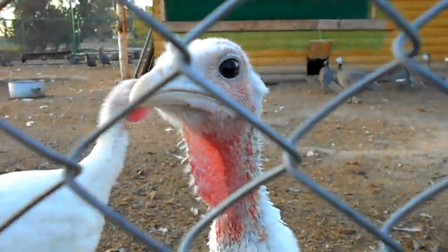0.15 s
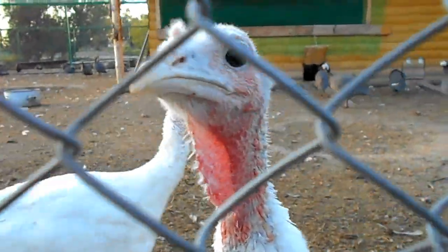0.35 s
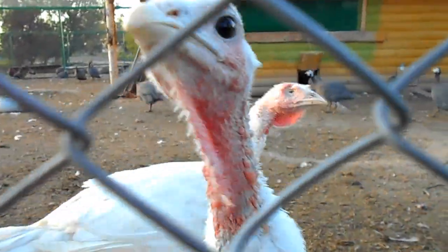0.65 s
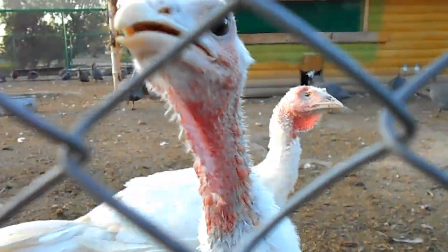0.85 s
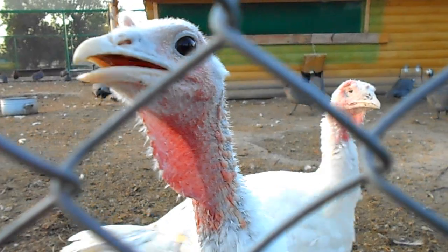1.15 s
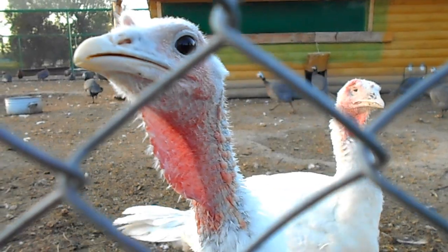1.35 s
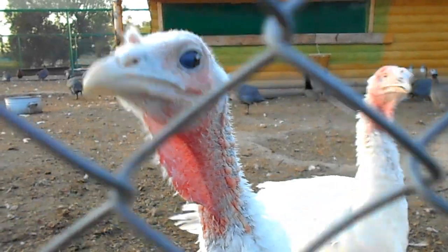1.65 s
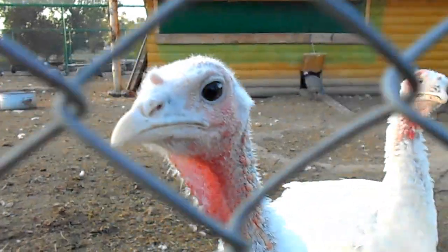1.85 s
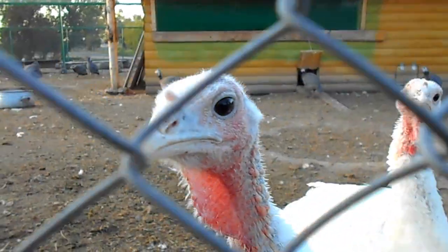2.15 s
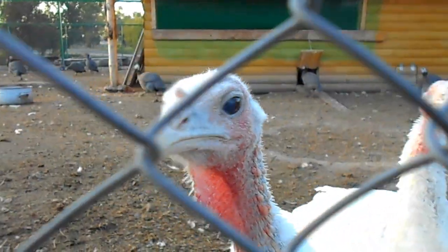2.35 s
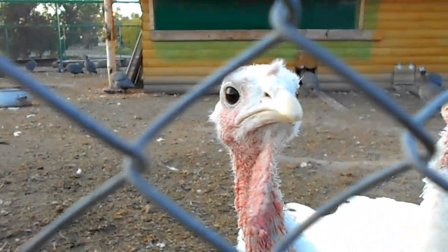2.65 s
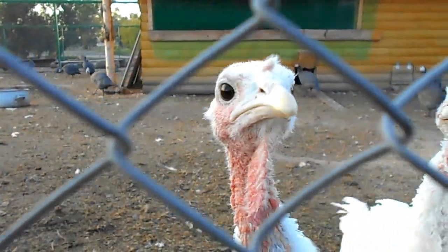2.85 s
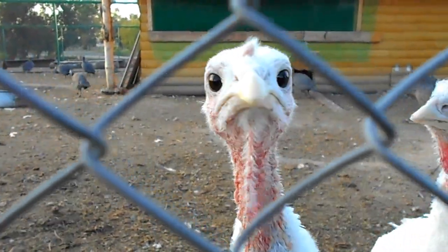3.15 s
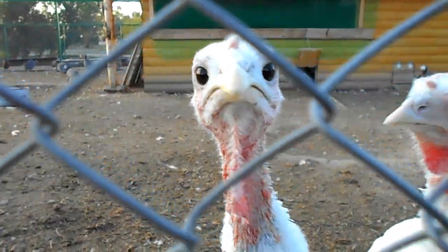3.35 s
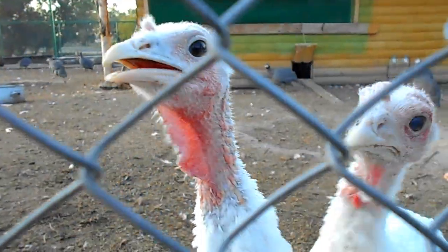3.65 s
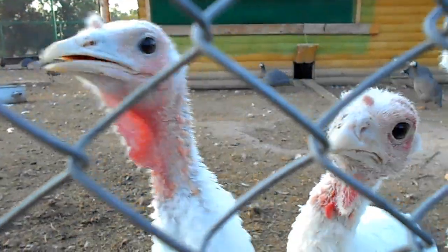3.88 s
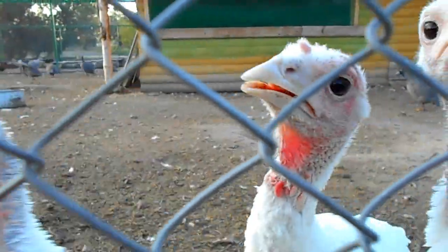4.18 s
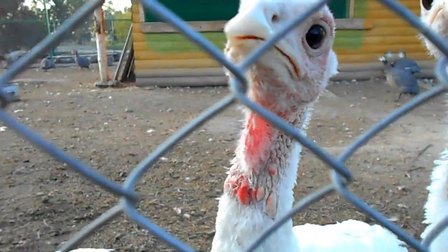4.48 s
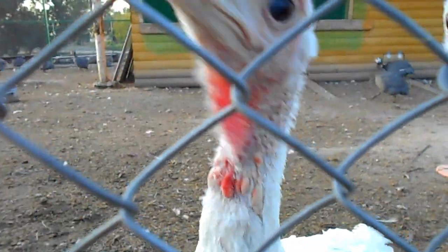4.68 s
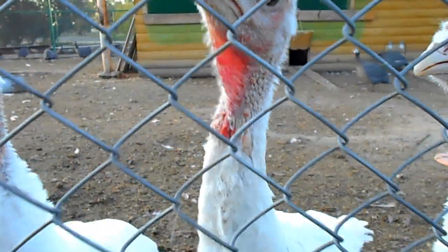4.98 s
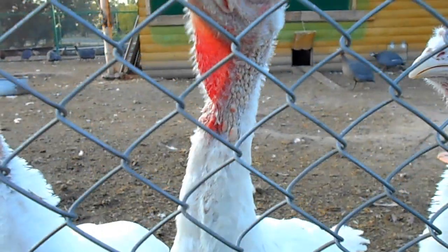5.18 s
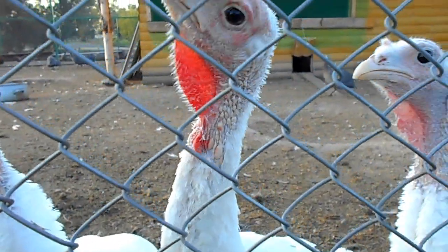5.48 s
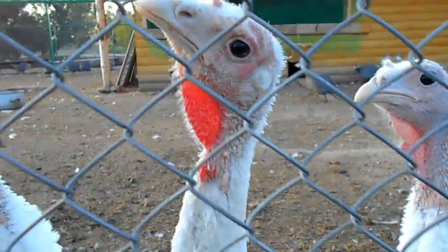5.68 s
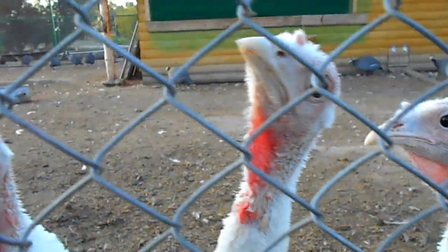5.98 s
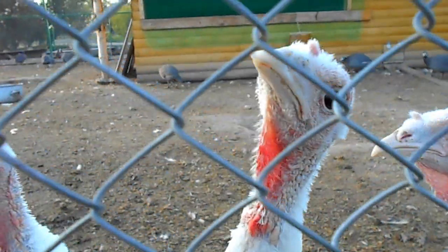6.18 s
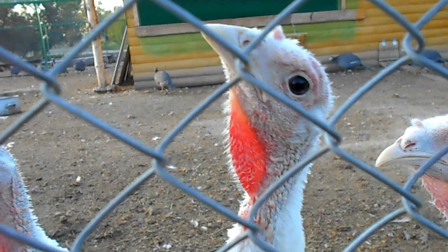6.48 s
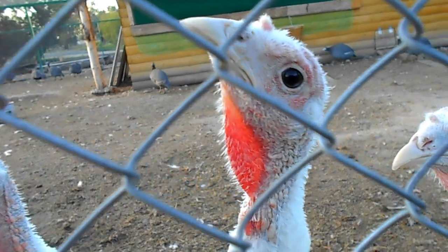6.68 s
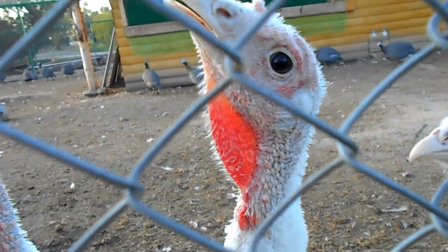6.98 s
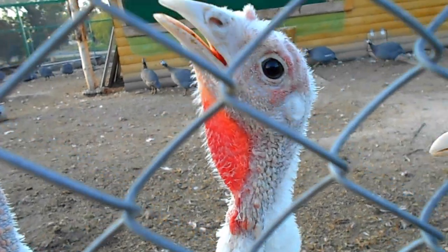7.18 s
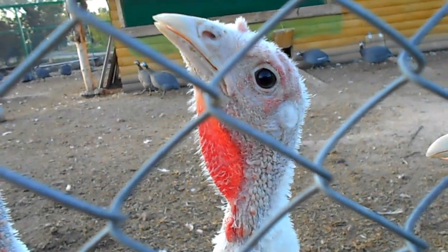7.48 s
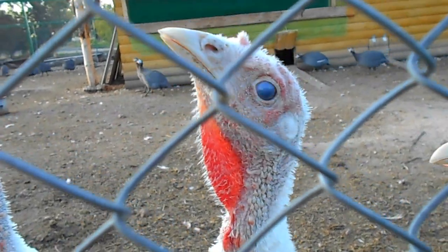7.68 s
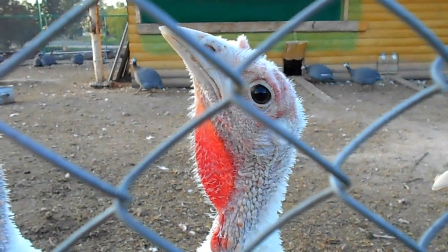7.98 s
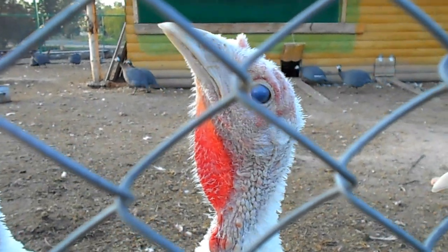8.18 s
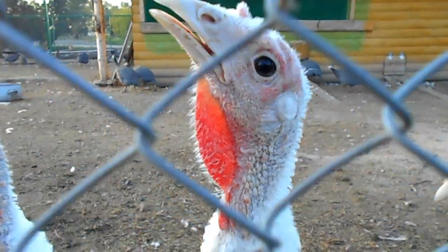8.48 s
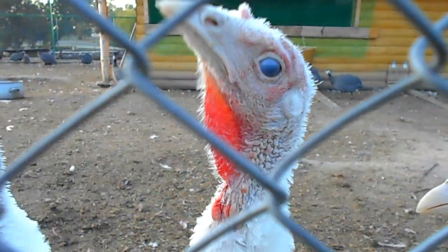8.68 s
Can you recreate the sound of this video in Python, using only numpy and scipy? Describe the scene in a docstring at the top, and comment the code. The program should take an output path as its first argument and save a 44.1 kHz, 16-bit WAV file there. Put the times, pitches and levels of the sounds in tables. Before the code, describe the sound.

A small flock of turkeys sounds off behind a fence, the nearest birds very loud and nearly dry, others softer with short outdoor scatter. Raspy squawks come first, followed by bunches of piercing, cracking yelps, nasal whining and fluttering trills. Later, two-note cries, long then short, stand out among whines and yelps. Distant calls murmur throughout, and a last sharp yelp ends it.

```python
"""Turkeys in a farmyard pen: a coloured-noise din and hoarse squawks (tone, rasp, subharmonics) open the scene.
Nasal whines, peeps and breathy puffs join, with random faint calls across the yard.
Near yelps follow: a loud upward leap, a thin rattling whistle, a break into a loud fall; overloads crackle.
Then come warbling trills and dry noise ticks, and from mid-scene smoother two-note cries, long then short."""
import sys
import numpy as np
from scipy import signal
from scipy.fft import rfft, irfft
from scipy.io import wavfile

SR = 44100
rng = np.random.default_rng(int(sys.argv[2]) if len(sys.argv) > 2 else 0)


def to_wav(s):
    """Save 16-bit WAV."""
    ch = np.atleast_2d(s).T  # columns
    pcm = np.round(np.clip(ch, -1, 1) * 32767)  # PCM
    wavfile.write(sys.argv[1], SR, pcm.astype(np.int16))


N = 389844
T = np.arange(N) / SR
TOP_HZ = 15800  # upper band limit

# distant din, spectral shape: [f/Hz, density/dB per Hz]
DIN_SPECTRUM = [(25, -23), (60, -18.5), (120, -18.5), (300, -5), (600, -1.5), (1000, 2), (1700, 1.5),
                (2800, 0), (4200, -4.5), (6000, -15), (9500, -20.5), (11500, -48)]
# din swell about DIN_DB: [t/s, level/dB]
DIN_SWELL = [(0, 10.5), (.35, 6.5), (1.0, 7.5), (1.38, -4.5), (2.0, 9.5), (3.1, 7), (3.95, -9.5),
             (4.5, 4.5), (5.5, -2.5), (6.3, 5.5), (6.85, -2.5), (7.5, 2.5), (8.1, -3.5), (8.84, 4.5)]
DIN_DB = -59

# hoarse squawks: [start t/s, break t/s, end t/s, tone level/dB, rasp level/dB, tail level/dB]
SQUAWKS = [(-.12, .045, .11, -32, -27.5, -36), (0.516, 0.654, .717, -24.5, -28.5, -32.5),
           (1.718, 1.844, 1.908, -28.5, -27.5, -34), (2.349, 2.451, 2.512, -25.5, -25.5, -30),
           (2.94, 3.052, 3.127, -27.5, -27.5, -33), (3.556, 3.692, 3.745, -34, -34.5, -44)]
# squawk rasp, noise shape and growl partials: [f/Hz, level/dB]
RASP = [(60, -54), (250, -21.5), (700, -23.5), (1100, -8.5), (1500, 8.5), (2000, -3), (2800, 4.5),
        (3400, -7.5), (4500, -24), (6000, -30.5), (8500, -33), (11000, -53.5)]
# partials of a squawk's tail: [f/Hz, level/dB]
SQUAWK_TAIL = [(900, -12.0), (1850, 4.5), (2800, -3.0), (3700, -32.5), (8000, -45.5)]

# peeps and low clucks: [start t/s, end t/s, pitch f/Hz, level/dB]
PEEPS = [(0.366, 0.448, 1254, -34.5), (0.396, .49, 1450, -39.5), (0.452, 0.496, 2812, -28.5),
         (0.983, 1.022, 1258, -29), (3.148, 3.229, 1190, -49.5), (3.387, 3.43, 1643, -49),
         (5.582, 5.732, 1268, -48.5), (5.63, 5.712, 1487, -43.5), (6.347, 6.388, 2720, -34),
         (7.372, 7.428, 495, -52), (7.492, 7.543, 509, -51), (8.24, 8.267, 780, -48),
         (6.88, 6.938, 1176, -54.5), (7.542, 7.67, 1720, -54.5), (7.692, 7.736, 1320, -52),
         (7.829, 7.937, 2750, -55), (8.491, 8.597, 790, -52)]
PEEP_SAG = .04  # share of the pitch lost over a peep

# nasal whines: [start t/s, end t/s, pitch f/Hz, level/dB, buzz/0-1]
WHINES = [(0.372, 0.469, 745, -46, 0.7), (1.193, 1.308, 936, -41, 0.18), (1.395, 1.544, 977, -49.5, 0.12),
          (1.519, 1.836, 915.3, -38.5, 0.33), (1.913, 2.034, 909, -39.5, 0.02),
          (2.078, 2.324, 858, -36, 0.24), (2.473, 2.602, 869, -42, 0.22), (2.621, 2.817, 833, -47.5, 0.44),
          (3.568, 3.716, 880, -51.5, 0.6), (4.393, 4.777, 855, -45.5, .02),
          (5.616, 5.744, 940, -54.5, 0.14), (5.778, 6.092, 880, -45, 0.64), (6.092, 6.214, 984, -43, 0.3),
          (6.21, 6.387, 894, -40, 0.33), (6.413, 6.562, 930, -44, 0.73), (6.573, 6.754, 863, -52.5, 0.74),
          (6.74, 6.95, 857, -57, .05), (7.523, 7.679, 858, -56.5, 0.04)]
# partials of a whine: [f/Hz, level/dB]
NASAL = [(290, -10), (550, -19.5), (900, -7.5), (1350, -13), (1800, -10.5), (2150, -13.5), (2680, 1.5),
         (3100, -6.5), (3600, -13.5), (4400, -24.5), (5200, -30.5), (6200, -37.5), (9000, -43),
         (11000, -60)]
WHINE_SAG_HZ, WHINE_STEADY_S = 248, .15  # short whines slide down, long ones hold their pitch

# random far calls, per kind
FAR_CALLS_PER_S, FAR_PEEP_DB, FAR_WHINE_DB, FAR_MEAN_S = 3.0, -58.5, -67.5, .12

# puffs of air from the beaks: [start t/s, end t/s, centre f/Hz, width f/Hz, level/dB]
PUFFS = [(.46, 0.5, 3200, 1150, -32), (.9, 1.058, 6300, 900, -59.5), (3.34, 3.472, 6200, 880, -58.5),
         (7.09, 7.175, 4000, 1245, -38.5)]
# hiss of the open beak, spectral shape: [f/Hz, density/dB per Hz]
HISS = [(800, -46), (2500, -10.5), (4300, 4.5), (5200, -15.5), (6400, -6.5), (7500, -10.5), (9700, -13.5),
        (11200, -33.5)]

# yelps: [start t/s, break t/s, end t/s, crest f/Hz, leap level/dB, whistle level/dB, fall level/dB]
YELPS = [(.787, 0.89, .953, 2590, -6.5, -33, -15), (1.001, 1.069, 1.097, 2950, -5, -31, -15.5),
         (1.014, 1.107, 1.139, 2540, -22.5, -39, -30.5), (1.147, 1.23, 1.262, 3305, -8.5, -38, -17),
         (2.043, 2.159, 2.199, 2590, -21.5, -31, -16.5), (2.258, 2.338, 2.373, 2550, -13.5, -30.5, -14),
         (3.226, 3.333, 3.384, 2510, -14.5, -25, -15), (3.424, 3.516, 3.553, 2550, -10.5, -29.5, -15),
         (3.44, 3.539, 3.59, 2400, -8, -31.5, -16.5), (3.628, 3.704, 3.732, 2600, -13.5, -25.5, -16.5),
         (3.637, 3.711, 3.752, 2810, -6, -43, -18.5), (3.781, 3.861, 3.891, 3253, -9.5, -35, -17.5),
         (4.56, 4.665, 4.717, 2500, -17.5, -29, -15.5), (4.774, 4.855, 4.891, 2130, -6, -27.5, -17.5),
         (6.167, 6.272, 6.327, 2604, -15, -42, -18), (6.38, 6.454, 6.477, 2955, -5.5, -41, -16.5),
         (6.534, 6.626, 6.654, 3244, -10.5, -38.5, -16), (6.938, 7.107, 7.153, 2450, -24.5, -40.5, -20.5),
         (7.201, 7.286, 7.325, 2400, -16.5, -28.5, -19), (8.584, 8.707, 8.745, 2410, -46, -33.5, -21.5),
         (8.808, 8.885, 8.93, 2580, -12.5, -43.5, -15)]
# overtones against the fundamental, before brightening and rolloff: [f/Hz, level/dB]
THROAT = [(1000, -10), (1750, -0.5), (2150, -20.5), (2700, -17), (3400, -29), (4200, -36.5), (5000, -38),
          (6500, -43.5), (8200, -52.5), (10500, -70.5)]
# throat turbulence, spectral shape: [f/Hz, density/dB per Hz]
TURBULENCE = [(60, -68.5), (200, -49), (420, -22), (700, -12), (1250, 2), (2000, -6.5), (3000, -13),
              (4300, -31.5), (5400, -40.5), (6300, -30), (7300, -38), (9500, -40), (11500, -57.5)]
# a harder push makes the leap longer and carries its pitch higher; values hold at FULL_LEAP_DB
LEAP_S, LEAP_GROWTH, FULL_LEAP_DB = .0245, .2, -8
LEAP_FROM_HZ, LEAP_RISE_HZ = 1000, 1061
MAX_ATTACK_S, ONSET_DROP_DB, DWELL_SHARE = 0.0041, 3.5, .33
EASY_LEAP_DB, LEAD_IN_DB_PER_DB = -19.5, 0.43  # harder leaps build up from further below their peak
# time to the whistle's crest, pitch at the break, fading on the way, rattle beneath
CLIMB_S, BREAK_HZ, WHISTLE_FADE_DB, RATTLE_DB = .018, 1885, 4, -36
YELP_SAG, CRY_SAG = .33, 0.55  # share of the crest-to-break sag done halfway
YELP_SLIDE, CRY_SLIDE = 0.14, 0.44  # share of the climb that glides rather than jumps
YELP_SECOND, CRY_SECOND = 0.18, 0.95  # second membrane gain in leap and fall

# trills: [start t/s, end t/s, level/dB]
TRILLS = [(1.505, 1.795, -34), (2.72, 2.974, -26)]

# ticks: [t/s, level/dB, decay t/s]
TICKS = [(2.756, -38.5, .002), (4.261, -41, 0.036), (5.258, -40.5, 0.018), (8.443, -50, .003),
         (8.65, -37, 0.001)]

# two-note cries: [long start t/s, long end t/s, short start t/s, short end t/s, level/dB]
CRIES = [(4.027, 4.217, 4.28, 4.396, -16.5), (5.007, 5.216, 5.275, 5.388, -13.5),
         (6.935, 7.165, 7.219, 7.337, -14.5)]
# cry notes, long then short; levels relative to the cry: [edge f/Hz, crest f/Hz, leap level/dB,
# crest level/dB, pre-break level/dB, fall level/dB, hiss level/dB, share of note before hiss]
CRY_NOTES = [(1582, 1920, -17, -12.5, -2.5, -2, -34, 0.9), (1736, 2340, 1.5, -8.5, 0.5, -3.5, -34, .02)]
CRY_LEAP_S, CRY_CLIMB_S, CRY_HISS_LAG_S = .018, 0.028, .035
CRY_FALL_SHARE, CRY_RATTLE_DB = .16, -32.5  # share of the note; relative to the cry

# overload crackle, spectral shape: [f/Hz, density/dB per Hz]
CRACKLE = [(50, -15), (400, 0.5), (4000, 5.5), (9000, -7.5), (12000, -22), (16000, -23)]
# microphone response: [f/Hz, level/dB]
MICROPHONE = [(20, -11), (90, -2), (10000, 1.5), (11500, -7.5)]


def undb(db):
    """Decibels to gain."""
    return 10 ** (np.asarray(db) / 20)


def gain_at(hz, spectrum):
    """Gain of a [f/Hz, level/dB] spectrum, joined on a log-frequency axis."""
    points_hz, db = np.transpose(spectrum)
    return undb(np.interp(np.log(hz + 1), np.log(points_hz), db))


def equalize(x, spectrum):
    """Zero-phase filter with the gain of a spectrum."""
    bins_hz = np.arange(N // 2 + 1) * SR / N
    return irfft(rfft(x) * gain_at(bins_hz, spectrum), N)


def noise(spectrum):
    """Coloured noise of rms 1."""
    x = equalize(rng.standard_normal(N), spectrum)
    return x / x.std()


def fresh_rng():
    """Independent generator seeded by one draw."""
    return np.random.default_rng(rng.integers(2 ** 31))


def walk(t, rate_hz):
    """Random wander of spread near 1, with rate_hz new target points a second."""
    steps = fresh_rng().standard_normal(2048)
    return np.interp((t - t[0]) * rate_hz, np.arange(len(steps)), steps)


def span(start, end):
    """Sample indices and times of a call."""
    i = np.arange(max(int(start * SR), 0), min(int(end * SR), N))
    return i, T[i]


def fade(t, start, end, edge_s):
    """Smooth opening and closing of a call."""
    return np.sin(np.pi / 2 * np.clip(np.minimum(t - start, end - t) / edge_s, 0, 1)) ** 2


def phase_of(hz):
    """Running phase of a pitch contour."""
    return 2 * np.pi * np.cumsum(hz) / SR


def partials(hz, spectrum, multiples, uneven_db=2.53):
    """Multiples of a pitch, weighted by a throat that keeps shifting."""
    phase, t = phase_of(hz), T[:len(hz)]
    out = np.zeros(len(hz))
    for k in multiples:
        gain = gain_at(k * hz, spectrum) * undb(uneven_db * walk(t, 24)) * (k * hz < TOP_HZ)
        out += gain * np.sin(k * phase)
    return np.sqrt(2) * out


def whistle(hz, bright_db=0, rolloff_db=-2, shimmer=0.7, smear=0.48):
    """Syrinx tone; overtones weaken with their order and flicker each on its own."""
    phase, t = phase_of(hz), T[:len(hz)]
    out = np.sin(phase)
    for k in range(2, 7):
        gain = gain_at(k * hz, THROAT) * undb(bright_db + rolloff_db * (k - 2)) * (k * hz < TOP_HZ)
        out += gain * (1 + shimmer * walk(t, 160)) * np.sin(k * phase + smear * k * walk(t, 350))
    return np.sqrt(2) * out


def ring(x, hz, width_hz):
    """One resonance, gain 1 at its centre."""
    return signal.lfilter(*signal.iirpeak(hz, hz / width_hz, fs=SR), x)


def pen(x, near_db=-23, near_t60_s=0.21, far_db=-39, far_t60_s=0.15):
    """Scatter around the pen: two decaying noise tails starting 2 ms after the direct sound."""
    t = T[:SR // 2]
    response = np.zeros(len(t))
    for db, t60_s in ((near_db, near_t60_s), (far_db, far_t60_s)):
        tail = rng.standard_normal(len(t)) * np.exp(-np.log(1000) * t / t60_s) * (t > .002)
        response += undb(db) * tail / np.linalg.norm(tail)
    return x + signal.fftconvolve(x, response)[:N]


def far_calls(low_hz, high_hz, db, spread_db=6):
    """Random faint calls across the yard: [start t/s, end t/s, pitch f/Hz, level/dB]."""
    draws = fresh_rng().random((int(FAR_CALLS_PER_S * T[-1]), 4))
    calls = []
    for when, length, pitch, loud in draws:
        start = when * T[-1]
        end = start + FAR_MEAN_S * (.5 + length)
        calls.append((start, end, low_hz * (high_hz / low_hz) ** pitch, db + spread_db * (loud - .5)))
    return calls


def din():
    """Distant din of the farm: coloured noise, gently swelling."""
    db = DIN_DB + np.interp(T, *np.transpose(DIN_SWELL)) + 0.5 * walk(T, 42)
    return undb(db) * noise(DIN_SPECTRUM)


def squawks(first_hz=1200, last_hz=1520, tail_hz=950, growl_db=-5, growl_jitter=.035):
    """A rising tone turns hoarse, with ragged partials on a third of its pitch, then breaks lower."""
    out, rasp = np.zeros(N), noise(RASP)
    for start, brk, end, tone_db, rasp_db, tail_db in SQUAWKS:
        i, t = span(start, end)
        hz = first_hz + (last_hz - first_hz) * np.clip((t - start) / (brk - start), 0, 1) ** 0.77
        tone = whistle(hz * (1 + 0.02 * walk(t, 270))) * (1 + .3 * walk(t, 150))
        out[i] += undb(tone_db) * fade(t, start, brk + 0.011, 0.028) * tone
        growl = partials(hz / 3 * (1 + growl_jitter * walk(t, 500)), RASP, np.arange(2, 12))
        hoarse = 0.9 * rasp[i] + undb(growl_db) * growl / growl.std()
        out[i] += undb(rasp_db) * fade(t, start + 0.013, end - .005, 0.071) * hoarse
        falling_hz = tail_hz * (1 - .7 * (t - brk) + .008 * walk(t, 250))
        tail = partials(falling_hz, SQUAWK_TAIL, np.arange(1, 9))
        out[i] += undb(tail_db) * fade(t, brk - .02, end + 0.0096, 0.045) * tail
    return out


def peeps():
    """Short soft downward glides, near and far."""
    out = np.zeros(N)
    for start, end, pitch_hz, db in PEEPS + far_calls(low_hz=1109, high_hz=2770, db=FAR_PEEP_DB):
        i, t = span(start, end)
        sag = PEEP_SAG * (.5 - (t - start) / (end - start))
        hz = pitch_hz * (1 + sag) * (1 + .014 * walk(t, 260))
        out[i] += undb(db) * fade(t, start, end, 0.017) * whistle(hz)
    return out


def whines(jitter=0.0075, far_buzz=0.27):
    """Nasal notes; when they buzz, every third cycle differs and lines appear between the harmonics."""
    out = np.zeros(N)
    thirds = np.array([k / 3 for k in range(1, 20) if k % 3])
    far = [(*call, far_buzz) for call in far_calls(low_hz=786, high_hz=1080, db=FAR_WHINE_DB)]
    for start, end, pitch_hz, db, buzz in WHINES + far:
        i, t = span(start, end)
        sag_hz = WHINE_SAG_HZ * np.exp(-((end - start) / WHINE_STEADY_S) ** 2)
        hz = pitch_hz + sag_hz * (.5 - (t - start) / (end - start))
        hz = hz * (1 + jitter * walk(t, 300) + .005 * walk(t, 19))
        voice = partials(hz, NASAL, np.arange(1, 9)) + buzz * partials(hz, NASAL, thirds)
        out[i] += undb(db - 3 + 0.85 * walk(t, 55)) * fade(t, start - .008, end + .008, 0.029) * voice
    return out


def puffs(cry_hz=5000, cry_width_hz=9000):
    """Air forced through a narrow beak opening; a broad hiss also accompanies every note of a cry."""
    out, air = np.zeros(N), noise(HISS)
    with_cries = [(start + wait * (end - start), end + CRY_HISS_LAG_S, cry_hz, cry_width_hz, db + hiss_db)
                  for start, end, db, (*_, hiss_db, wait) in cry_notes()]
    for start, end, hz, width_hz, db in PUFFS + with_cries:
        i, t = span(start, end)
        x = ring(air[i], hz, width_hz)
        out[i] += undb(db + 2.5 * walk(t, 90)) * fade(t, start, end, .025) * x / x.std()
    return out


def yelp_arches():
    """Times, pitches, shape and levels of each yelp; the push sets the leap, the whistle then fades."""
    for start, brk, end, crest_hz, leap_db, whistle_db, fall_db in YELPS:
        push = undb(LEAP_GROWTH * (leap_db - FULL_LEAP_DB))
        shoulder = start + LEAP_S * push
        yield ((start, shoulder, shoulder + CLIMB_S, brk, end),
               (LEAP_FROM_HZ + LEAP_RISE_HZ * push, crest_hz, BREAK_HZ),
               (YELP_SLIDE, YELP_SAG, YELP_SECOND),
               (leap_db, whistle_db, whistle_db - WHISTLE_FADE_DB, fall_db, RATTLE_DB))


def yelps_and_cries(rattle_hz=1310, beat_hz=115, beat_depth=.45, jitter=.011, air_db=-27, flutter=0.17,
                    bright_db=11, second_ratio=.9):
    """The membrane leaps into a whistle, beats against a lower vibration, then breaks into a fall."""
    out, effort = np.zeros(N), np.zeros(N)
    for times, pitches, (slide, sag, second_share), levels in [*yelp_arches(), *cry_arches()]:
        start, shoulder, crest, brk, end = times
        shoulder_hz, crest_hz, late_hz = pitches
        leap_db, crest_db, late_db, fall_db, rattle_db = levels
        opening, leap = start - .001, start + DWELL_SHARE * (shoulder - start)
        before, after, fall = brk - .001, brk + .0025, end - brk
        step = (shoulder + crest) / 2
        i, t = span(opening, end + .004)

        # pitch hangs on the shoulder, jumps to the crest, sags, drops at the break
        hz = np.interp(
            t,
            [start, leap, shoulder, step, step + .003, crest,
             (crest + brk) / 2, before, after, brk + fall / 2, end],
            [820, LEAP_FROM_HZ, shoulder_hz, shoulder_hz + slide * (crest_hz - shoulder_hz),
             .96 * crest_hz, crest_hz, crest_hz - sag * (crest_hz - late_hz), late_hz,
             min(1650, .95 * late_hz), 1300, 700])
        lead_db = LEAD_IN_DB_PER_DB * max(leap_db - EASY_LEAP_DB, 0)
        db = np.interp(
            t,
            [opening, opening + min(MAX_ATTACK_S, .8 * (leap - opening)), leap, (leap + shoulder) / 2,
             shoulder, crest, before, after, brk + fall / 2, end - fall / 5, end],
            [leap_db - 12.5 - 2 * lead_db, leap_db - ONSET_DROP_DB - 2 * lead_db,
             leap_db - 0.6 * lead_db, leap_db + 0.5, 0.78 * leap_db + 0.21 * crest_db, crest_db,
             late_db, fall_db - 0.5, fall_db + 0.5, fall_db - 4.5, fall_db - 22])

        high = fade(t, shoulder - .004, after, 0.011)  # the whistling register
        beat = np.sin(phase_of(beat_hz * (1 + 0.18 * walk(t, 70))))
        rattling = min(1, 2 * undb(rattle_db - crest_db))
        rough = 1 - 0.61 * high * (1 - rattling)  # a whistle without rattle runs smooth
        gain = undb(db) * fade(t, opening, end + 0.0014, 0.0034)
        gain = gain * (1 + flutter * rough * walk(t, 350))
        waver = rough * (jitter * walk(t, 600) + .015 * walk(t, 130)) + 0.012 * rattling * high * beat
        waver += .03 * rough * np.round(.8 * walk(t, 90))  # pitch hops between neighbouring states

        main = whistle(hz * (1 + waver), bright_db=bright_db * high * rattling)
        out[i] += gain * (1 + beat_depth * rattling * high * beat) * main
        # outside the whistling register a second membrane, out of step, roughens the note
        second = whistle(hz * (second_ratio + .08 * walk(t, 120)))
        out[i] += second_share * gain * (1 - high) * second
        rattle = np.sin(phase_of(rattle_hz * (1 + .045 * walk(t, 250))))
        out[i] += undb(rattle_db) * high * (1 + 0.74 * beat) * rattle
        effort[i] += gain ** 0.56
    out += 0.57 * ring(out, hz=1966, width_hz=37)  # windpipe rings as the pitch sweeps through it
    return out + undb(air_db + 2 * walk(T, 40)) * effort * noise(TURBULENCE)


def trills(warble_hz=22.28, centre_hz=1770, swing_hz=210, under_hz=1150, throb_db=7):
    """A note starts level, swings wider, drops away; each trough swells with a lower tone."""
    out = np.zeros(N)
    for start, end, db in TRILLS:
        i, t = span(start, end)
        grow = np.clip((t - start - .03) / 0.082, 0, 1)
        swing = np.cos(2 * np.pi * warble_hz * (t - end + .037) + 0.47 * walk(t, 35))
        hz = (1 - grow) * 1500 + grow * (centre_hz + swing_hz * swing)
        drop = np.clip((t - end + 0.042) / 0.025, 0, 1)
        hz = (hz * (1 - drop) + 780 * drop) * (1 + 0.014 * walk(t, 400))
        trough = grow * (1 - drop) * np.maximum(-swing, 0) ** 2
        voice = whistle(hz, bright_db=8 - 8.8 * trough) * (1 + 0.17 * walk(t, 210))
        voice += 1.78 * trough * np.sin(phase_of(under_hz * (1 + 0.21 * walk(t, 300))))
        out[i] += undb(db - 5.1 * (2.0 - grow) + throb_db * trough) * fade(t, start, end, 0.016) * voice
    return out


def ticks():
    """Small dry ticks: noise bursts with exponential decay."""
    out, grain = np.zeros(N), noise(HISS)
    for start, db, decay_s in TICKS:
        i, t = span(start, start + 0.12)
        out[i] += undb(db) * np.exp(-(t - start) / decay_s) * grain[i]
    return out


def cry_notes():
    """Every note of the cries as (start, end, level, kind of note)."""
    for long_start, long_end, short_start, short_end, db in CRIES:
        yield long_start, long_end, db, CRY_NOTES[0]
        yield short_start, short_end, db, CRY_NOTES[1]


def cry_arches():
    """A cry note is a lower, smoother arch with a late break."""
    for start, end, db, note in cry_notes():
        edge_hz, crest_hz, leap_db, crest_db, late_db, fall_db, _, _ = note
        shoulder = start + CRY_LEAP_S
        brk = end - CRY_FALL_SHARE * (end - start)
        yield ((start, shoulder, shoulder + CRY_CLIMB_S, brk, end),
               (edge_hz, crest_hz, edge_hz),
               (CRY_SLIDE, CRY_SAG, CRY_SECOND),
               db + np.array([leap_db, crest_db, late_db, fall_db, CRY_RATTLE_DB]))


def scene():
    """Near birds almost dry, the flock with more of the pen around it."""
    flock = squawks() + peeps() + whines() + trills()
    near = puffs() + yelps_and_cries() + ticks()
    flock_in_pen = pen(flock, near_db=-6.5, near_t60_s=0.089, far_db=-18, far_t60_s=0.4)
    return (din() + flock_in_pen + pen(near))[None]


def record(dry, ceiling=0.7, knee=0.53, thump_knee=0.48, crackle_db=-18, thump_db=-17):
    """The microphone flattens the loudest peaks; the overload adds crackle and a low thump."""
    x = dry / (1 + (np.abs(dry) / ceiling) ** 8) ** (1 / 8)
    excess = np.clip(np.abs(dry) - knee, 0, .35)
    x = x + undb(crackle_db) * excess * noise(CRACKLE)
    hard = np.clip(np.abs(dry) - thump_knee, 0, .3)
    x = x + undb(thump_db) * signal.sosfilt(signal.butter(2, 250, fs=SR, output="sos"), hard)
    x = equalize(x, MICROPHONE)  # weak at both ends
    return signal.sosfilt(signal.ellip(8, .2, 70, TOP_HZ, fs=SR, output="sos"), x)


dry = scene()
out = record(dry)
to_wav(out)
```